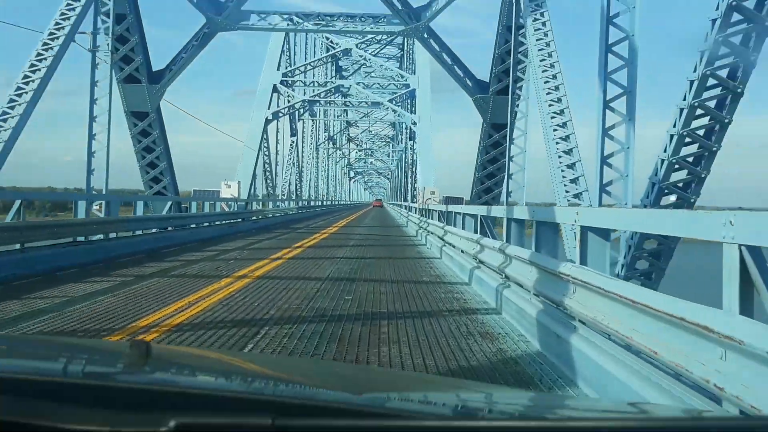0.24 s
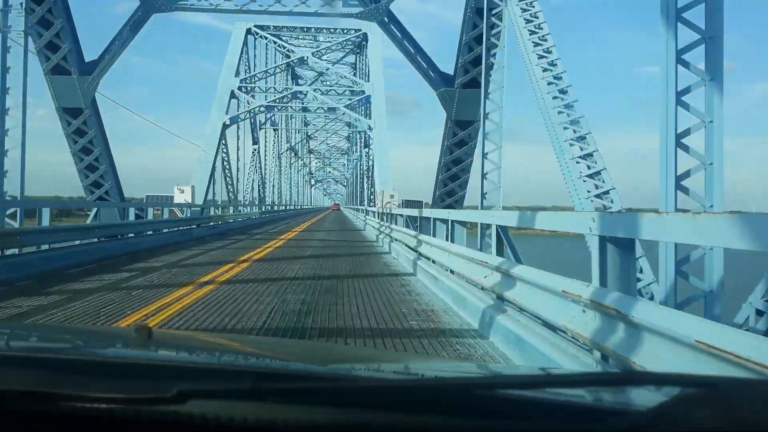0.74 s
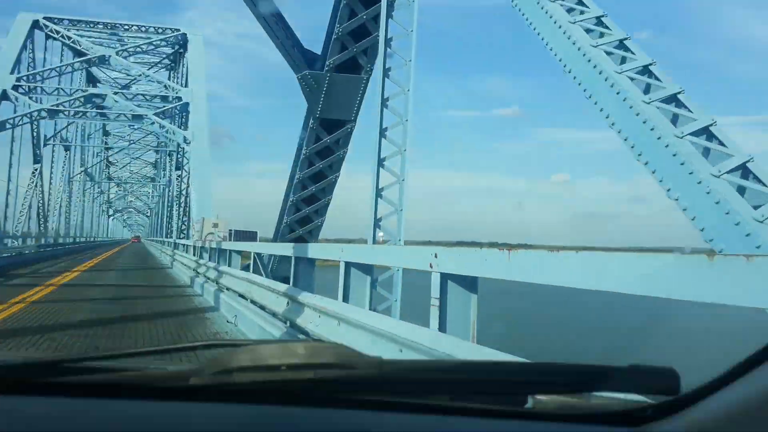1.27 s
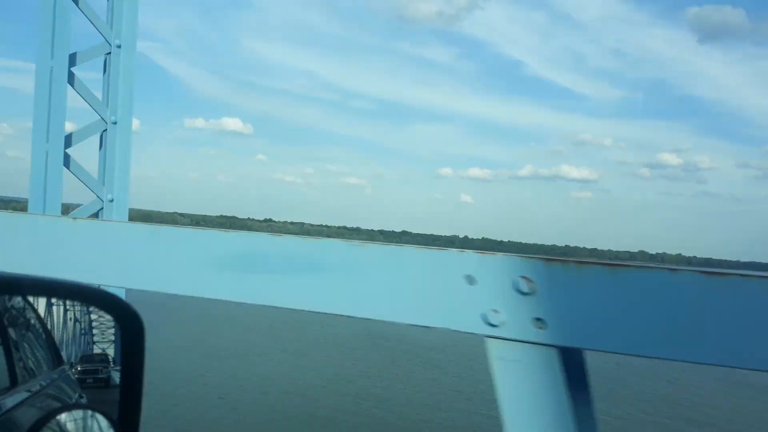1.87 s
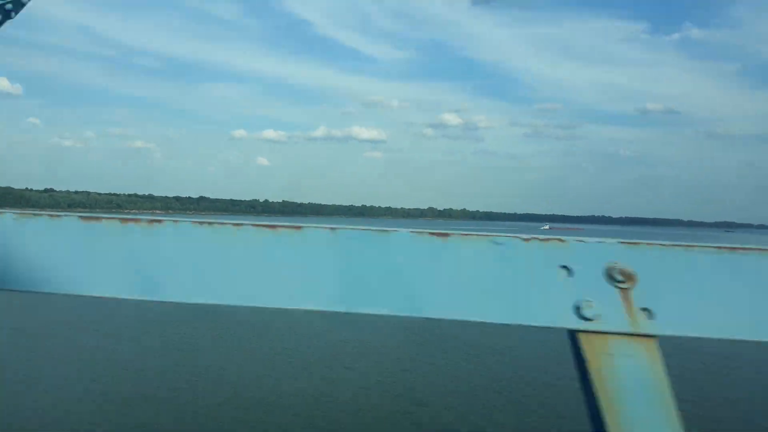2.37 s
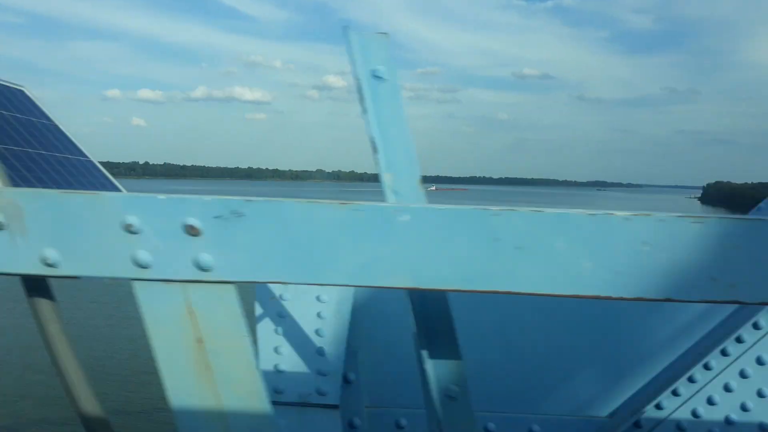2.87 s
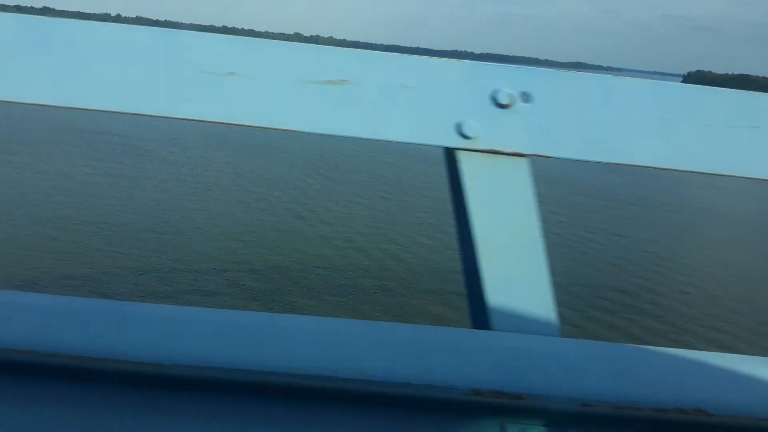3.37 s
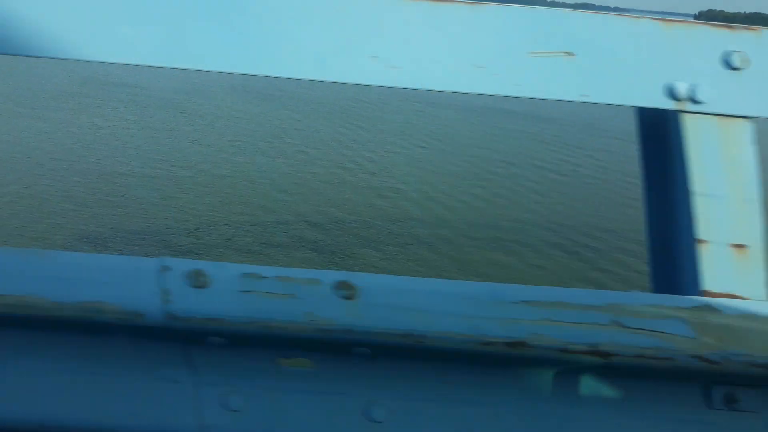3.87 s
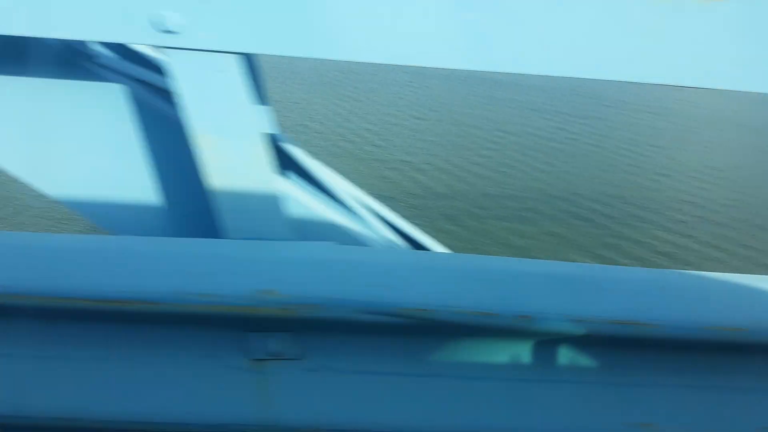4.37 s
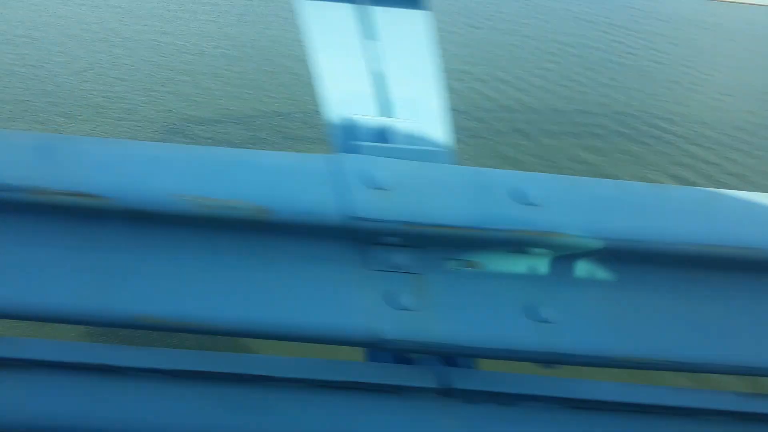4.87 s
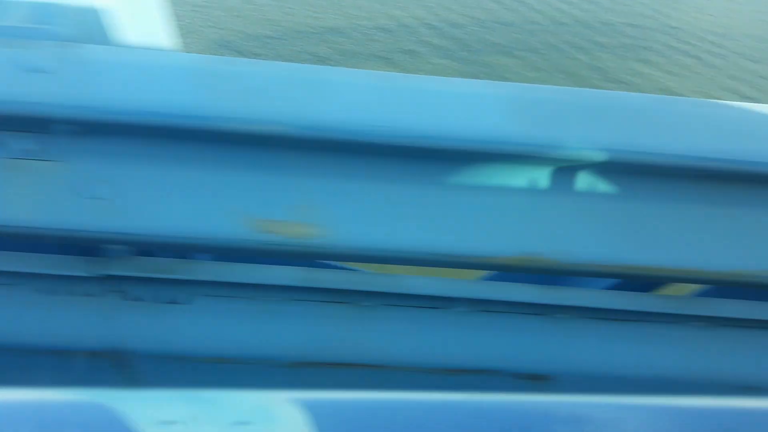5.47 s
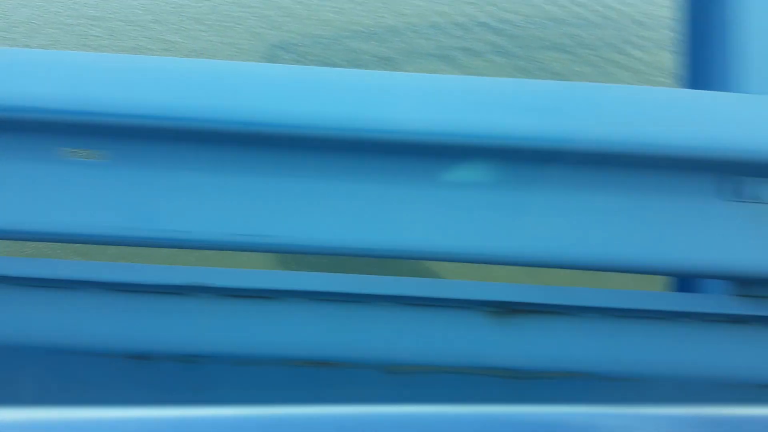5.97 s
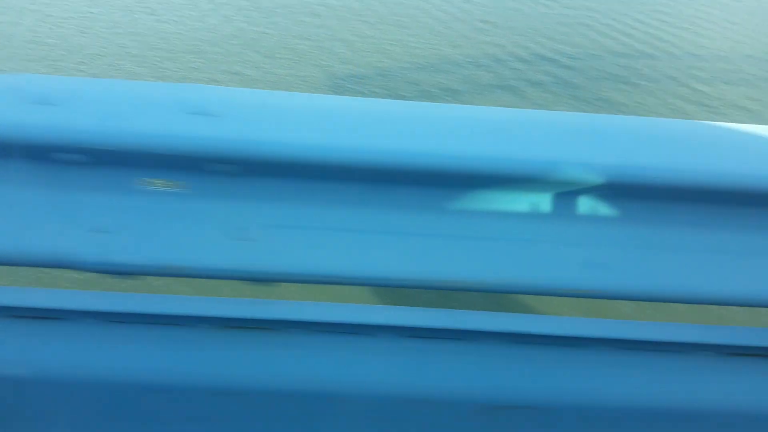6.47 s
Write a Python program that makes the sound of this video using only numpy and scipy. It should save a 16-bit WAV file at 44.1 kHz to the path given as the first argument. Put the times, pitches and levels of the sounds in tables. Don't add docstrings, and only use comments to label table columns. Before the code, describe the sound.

A steady low tyre drone dominates the car cabin, wavering and briefly dipping at deck seams, over deep body rumble and muffled road roar. First another car passes away on the other side, then a strong soft thump, handling ticks and cloth rubbing come close by. Thumps cluster around three seconds and another is strong just after four. Hand-held stereo microphones, enclosed and bass-heavy, with only faint hiss.

```python
import sys
import numpy as np
from scipy import signal
from scipy.fft import rfft, irfft, next_fast_len
from scipy.io import wavfile

SR = 44100
rng = np.random.default_rng(int(sys.argv[2]) if len(sys.argv) > 2 else 0)


def linear_from_db(decibels):
    return 10 ** (np.asarray(decibels, float) / 20)


def master(y):
    cut = np.clip(np.atleast_2d(y).T, -1, 1)
    pcm = np.round(cut * 32767)
    wavfile.write(sys.argv[1], SR, pcm.astype(np.int16))


N = 296793


def rms_one(x):
    return x / np.sqrt(np.mean(x ** 2) + 1e-20)


def in_time(rows):
    s, *columns = np.transpose(rows)
    return [np.interp(np.arange(N) / SR, s, column) for column in columns]


def at_hz(points, hz):
    table_hz, value = np.transpose(points)
    return np.interp(np.log(hz + 1), np.log(table_hz), value)


def drift(rate_hz):
    pole = np.exp(-80 * np.pi * rate_hz / SR)
    white = rng.standard_normal(N // 40 + 2002)
    slow = signal.lfilter([1], [1, -2 * pole, pole * pole], white)[2000:]
    return np.interp(np.arange(N) / 40, np.arange(len(slow)), rms_one(slow))


def sides(pan_db):
    return np.array([linear_from_db(pan_db / 2), linear_from_db(-pan_db / 2)])


# pitch_hz, likeness (-1 to 1)
LIKENESS = [(60, 1), (130, 0.97), (290, 0.84), (640, 0.28), (1410, -0.46), (3100, 0.042), (6820, -0.13),
            (15000, -0.031)]
# pitch_hz, left_minus_right_db
BALANCE = [(60, -1), (110, 1.5), (200, -0.5), (380, 0), (700, 0.5), (1290, 0.5), (2380, 1), (4400, -5),
           (8120, 4), (15000, -4)]


def coloured(spectrum, patchy_db, flicker_hz):
    size = next_fast_len(N)
    hz = np.arange(size // 2 + 1) * SR / size
    low, high = spectrum[0][0], spectrum[-1][0]
    alike = np.clip(at_hz(LIKENESS, hz), -0.99, 0.99)
    mid, side = rfft(rng.standard_normal((2, size)))
    both = np.sqrt(1 + alike) * mid + np.sqrt(1 - alike) * side * [[1], [-1]]
    both = both * linear_from_db(at_hz(spectrum, hz)) * (hz > low) * (hz < high)
    both = both * sides(at_hz(BALANCE, hz))
    half_octaves = 2 * np.log2(hz + 1)
    out = 0
    for k in range(int(2 * np.log2(low)), int(2 * np.log2(high)) + 2):
        band_gain = np.clip(1 - np.abs(half_octaves - k), 0, 1)
        band = irfft(both * band_gain, size)[:, :N]
        out = out + band * linear_from_db(patchy_db * drift(flicker_hz))
    return rms_one(out)


# pitch_hz, level_db (per Hz)
PREAMP = [(6000, -7), (8500, -5.5), (12000, 2.5), (15790, 2.5)]


def preamp_noise():
    return linear_from_db(-78) * coloured(PREAMP, patchy_db=2.0, flicker_hz=8.0)


# time_s, level_db
ONCOMING = [
    (0, -47.5),
    (.1, -37.5),
    (.35, -42.5),
    (.6, -55),
    (.9, -58),
    (1.2, -87),
]
# pitch_hz, level_db (per Hz)
ONCOMING_TONE = [(420, -20.5), (600, -5), (750, 2), (850, 2.5), (1000, -10), (1400, -11), (1800, -21),
                 (2400, -39)]


def oncoming_car():
    level_db, = in_time(ONCOMING)
    return linear_from_db(level_db) * coloured(ONCOMING_TONE, patchy_db=2.0, flicker_hz=3.8)


# time_s, level_db (about the mean)
SHAKE = [(0, 2), (.47, 2.5), (.9, 0), (1.25, -2), (1.5, -4), (1.9, 0.5), (2.4, 0), (2.6, 0), (2.9, 0),
         (3.05, -1.5), (3.4, 0), (3.75, -2), (3.95, 1.5), (4.28, 2), (4.7, 0), (5.2, -0.1), (5.7, -2),
         (6.73, -1)]


def shaken(mean_db, follows):
    shake_db, = in_time(SHAKE)
    return mean_db + follows * shake_db


def turned():
    start_s, length_s = 1.4, 0.31
    return np.clip((np.arange(N) / SR - start_s) / length_s, 0, 1)


# pitch_hz, level_db (per Hz)
HISS = [(1000, -25.5), (1400, 2.5), (2000, -0.5), (2700, -6), (3600, -6.5), (4300, -8), (5100, -18.5),
        (6500, -13.5), (6900, -18), (7100, -29.5), (8200, -39), (10000, -52.5)]


def hiss():
    level_db = shaken(-55, follows=0.54) + 1.5 * turned()
    return linear_from_db(level_db) * coloured(HISS, patchy_db=1.4, flicker_hz=4.5)


# pitch_hz, level_db (per Hz)
ROAR = [(250, -30.5), (350, -1), (440, -1), (520, -1.5), (635, 0.5), (710, -8.5), (870, -16.5), (1250, -18),
        (1450, -38.5), (2000, -44.5)]


def roar():
    level_db = shaken(-34.5, follows=0.96) + 1.5 * turned()
    return linear_from_db(level_db) * coloured(ROAR, patchy_db=1.0, flicker_hz=5.0)


# pitch_hz, level_db (per Hz)
BOOM = [(150, -29), (185, -17.5), (207, -13), (225, -0.5), (240, -6), (258, -12), (290, -4), (330, -8),
        (380, -23), (480, -33)]


def boom():
    level_db = shaken(-27, follows=1.98) - 1 * turned()
    return linear_from_db(level_db) * coloured(BOOM, patchy_db=0.1, flicker_hz=1.6)


# middle_s, half_length_s, first_multiple_loss_db,
# second_multiple_loss_db (negative: a swell)
SEAMS = [(0.104, .06, -3, 20), (0.173, 0.072, 10, 14), (0.286, 0.062, 3.5, 11), (0.373, 0.05, -5, 13),
         (0.71, 0.17, 17, 3.5), (1.17, 0.17, 13, 7.5), (1.541, 0.063, 11, 1.5), (2.222, 0.11, 1.5, 9),
         (2.489, 0.041, 6.5, 3), (2.569, 0.14, -3.5, 11), (2.893, 0.082, 2, 11), (3.093, 0.12, 3, 11),
         (3.165, 0.035, 1, 13), (3.35, 0.046, 12, 6), (3.53, 0.09, 3.5, 3.5), (3.687, 0.039, 7, 9.5),
         (4.007, 0.16, -2.5, 1.5), (4.99, .05, 1, 6), (5.22, 0.098, 11.5, 2.5), (5.518, 0.091, 2, 21.5),
         (5.95, 0.03, 12, -1), (6.075, 0.027, 10, -5), (6.618, 0.056, 7, 4.5), (0.847, 0.049, -2.5, -10.5),
         (1.94, 0.043, 6, -3.5), (3.272, 0.042, 5, 3), (4.29, 0.056, -2, -1.5), (5.08, 0.039, -7, -4.5),
         (6.212, 0.043, 2.5, 2), (6.387, 0.03, 10, 11)]


def seams_db():
    t = np.arange(N) / SR
    loss = np.zeros((2, N))
    for middle_s, length_s, *loss_db in SEAMS:
        crossing = np.clip(1 - np.abs(t - middle_s) / length_s, 0, 1)
        loss += np.outer(loss_db, crossing)
    return loss


# pitch_hz, level_db (per Hz)
RUMBLE = [(22, -37.5), (45, -14.5), (60, -17.5), (75, -11.5), (90, -1.5), (102, 0), (114, 0), (135, -4),
          (165, -0.5), (185, -4.5), (230, -25.5), (300, -53.5)]


def rumble():
    lull_db = 0.14 * seams_db().min(axis=0)
    level_db = shaken(-21.5, follows=0.96) - lull_db
    return linear_from_db(level_db) * coloured(RUMBLE, patchy_db=2.45, flicker_hz=1.1)


# start_s, peak_db, pitch_hz, t60_s
THUMPS = [(0.46, -5.5, 95.7, 0.22), (2.631, -12, 109.6, 0.35), (2.9, -18, 79.7, 0.2),
          (4.247, -5.5, 86.4, 0.25), (.42, -14, 225.4, 0.48), (2.858, -15.5, 222.3, .3),
          (3.1, -20, 230.4, 0.42), (3.269, -22.5, 227.5, 0.29), (3.849, -17.5, 233.6, 0.34),
          (4.201, -18.5, 218.5, .35), (4.718, -17.5, 236, .4), (3.129, -12.5, 70.6, .3)]


def thumps():
    out, t = np.zeros(N + SR), np.arange(SR) / SR
    for start_s, peak_db, pitch_hz, t60_s in THUMPS:
        i = round(start_s * SR)
        soft_start = 1 - np.exp(-t / 0.024)
        decay = linear_from_db(peak_db + 1.5 - 60 * t / t60_s)
        out[i:i + SR] += decay * soft_start * np.sin(2 * np.pi * pitch_hz * t)
    return out[:N]


# start_s, end_s, pitch_hz,
# width_hz, level_db
SINGING = [(0, 1.23, 6330, 330, -60.5), (.2, 0.88, 4300, 150, -62.5), (0.565, 0.74, 2880, 800, -48),
           (0.581, .74, 4000, 330, -52.5), (0.542, 0.76, 15000, 2200, -50),
           (0.634, 0.678, 11870, 900, -45.5), (1.2, 1.7, 930, 60, -54), (2.102, 2.648, 1884, 200, -59),
           (3.1, 3.695, 2560, 90, -64), (3.451, 3.509, 4200, 132, -49.5), (5.912, 5.938, 1500, 700, -50),
           (3.455, 3.5, 2100, 900, -54), (5.97, 6.12, 2700, 2000, -57), (5.948, 6.08, 15000, 1500, -78),
           (6.49, 6.52, 15000, 1470, -85.5)]


def singing():
    out = np.zeros((2, N))
    white = rng.standard_normal((2, SR * 2))
    for start_s, end_s, pitch_hz, width_hz, level_db in SINGING:
        i, size = round(start_s * SR), round((end_s - start_s) * SR)
        b, a = signal.iirpeak(pitch_hz, pitch_hz / width_hz, fs=SR)
        once = signal.lfilter(b, a, white[:, i // 8:i // 8 + size])
        tone = signal.lfilter(b, a, once)
        out[:, i:i + size] += linear_from_db(level_db) * rms_one(tone) * np.hanning(size) ** 0.34
    top = signal.ellip(10, 0.5, 60, 15760, fs=SR, output="sos")
    return signal.sosfilt(top, out + 1e-18)


# start_s, peak_db, pitch_hz, t60_s, left_minus_right_db
TICKS = [(.018, -35, 3600, 0.022, -4), (.042, -41, 4500, .015, 2), (.055, -36.5, 4000, .02, -13),
         (.094, -34, 4300, 0.015, -2), (0.565, -40.5, 3000, .05, -2), (.655, -28, 2010, 0.035, 11),
         (1.071, -50, 4230, 0.25, 1.5), (2.937, -39.5, 3640, 0.026, -6), (3.459, -42.5, 3100, 0.46, -5.5),
         (4.019, -50.5, 6830, 0.024, 1), (4.224, -42, 5500, 0.038, -4), (4.46, -45, 5000, 0.029, 1),
         (4.5, -48.5, 6900, 0.023, -4), (5.922, -35, 1500, 0.009, -3)]


def ticks():
    out, t = np.zeros((2, N + 8192)), np.arange(8192) / SR
    bursts = rng.standard_normal((len(TICKS), 3, len(t)))
    bursts = 0.7 * bursts[:, :1] + 0.84 * bursts[:, 1:]
    broad = signal.butter(2, 1100, "high", fs=SR, output="sos")
    edge = signal.cheby2(8, 45, 8000, fs=SR, output="sos")
    for (start_s, peak_db, pitch_hz, t60_s, pan_db), burst in zip(TICKS, bursts):
        b, a = signal.iirpeak(pitch_hz, 2.5, fs=SR)
        sound = signal.sosfilt(broad, burst) + 0.8 * signal.lfilter(b, a, burst)
        decay = linear_from_db(peak_db - 3.5 - 60 * t / t60_s)
        i = round(start_s * SR)
        out[:, i:i + len(t)] += sound * decay * sides(pan_db)[:, None]
    return signal.sosfilt(edge, out[:, :N] + 1e-18)


# middle_s, length_s, level_db, left_minus_right_db, fullness_db
STROKES = [(.06, 0.15, -78, 1.5, 14), (0.354, .12, -80, -5, 14), (0.598, .16, -66.5, 0, 1),
           (0.674, 0.13, -51.5, 3, 3), (0.77, .06, -64, -7.5, -0.5), (1.094, .1, -75, 1.5, 6.5),
           (1.31, 0.44, -71, 6, 0.5), (1.55, .2, -71.5, 5, 3), (1.614, .09, -58.5, -2, 1),
           (1.705, 0.067, -66, -3, 5), (1.83, 0.24, -72, 2, -2.5), (2.134, 0.17, -69, 0.5, -0.5),
           (2.4, 0.042, -69, -9, -3), (2.51, .07, -60.5, -8.5, -1.5), (2.62, 0.055, -64, -11, -2),
           (2.76, .09, -72, -8, 2.5), (2.847, 0.15, -67, -8, -3), (2.99, .06, -71, -8, -4),
           (3.135, 0.11, -69.5, -12, -1.5), (3.5, .25, -87, -9, -4)]
# pitch_hz, level_db (per Hz)
CLOTH_BRIGHT = [(5500, -34), (7000, 0.5), (8400, -13.5), (10000, -9.5), (11800, -7), (13000, -9.5),
                (14500, -5), (15790, -2.5)]
CLOTH_MIDDLE = [(1800, -29.5), (3000, -13), (4100, -2), (5000, -4), (6300, -1), (7000, -8), (7800, -19),
                (9500, -44.5)]


def sleeve():
    t = np.arange(N) / SR
    rub = linear_from_db(-72.5 - 5.5 * t)
    lean, full = 0, 0
    for middle_s, length_s, level_db, pan_db, full_db in STROKES:
        fall = np.minimum((2 * (t - middle_s) / length_s) ** 2, 10)
        stroke = linear_from_db(level_db - 21.5 * fall)
        rub = rub + stroke
        lean = lean + stroke * pan_db
        full = full + stroke * full_db
    bright_db = 20 * np.log10(rub)
    middle_db = -57.5 + 0.24 * (bright_db + 66.5) + full / rub
    moving = np.clip((3.9 - t) / 0.24, 0, 1)
    grain = linear_from_db(1.0 * drift(60.0))
    bright = linear_from_db(bright_db + 0.2) * coloured(CLOTH_BRIGHT, patchy_db=0.5, flicker_hz=12.0)
    middle = linear_from_db(middle_db) * coloured(CLOTH_MIDDLE, patchy_db=3.0, flicker_hz=6.0)
    return (bright + middle) * grain * moving * sides(lean / rub)


# time_s, grip_db, rear_behind_front (bar spacings, 0-0.5), edge_bite_db
AXLES = [(0, 0, .33, -3.5), (.37, 4.5, 0.31, -3), (.92, -3, 0.32, -9), (1.35, -1, 0.33, -7.5),
         (1.8, -2, 0.28, -6.5), (2.02, 6, 0.3, -3.5), (2.45, 2.5, 0.36, 4), (2.7, -0.6, 0.35, 1),
         (3.1, -1.5, 0.32, 0.5), (3.5, 5.5, 0.28, 0.5), (3.9, 0, 0.32, 2), (4.35, 3, 0.46, 1),
         (5.1, 3.5, 0.37, -4), (5.42, 3.5, .3, -3.5), (5.8, -5, 0.46, -11.5), (6.1, 1.5, 0.27, -2),
         (6.35, -0.4, 0.44, 0), (6.73, 3, 0.35, -4.5)]


def axles_db():
    grip_db, behind, bite_db = in_time(AXLES)
    seam_db = seams_db()
    levels_db = []
    for k, one_axle_db in enumerate([-19.5, -24.5]):
        rear = 0.76 * np.exp(2j * np.pi * (k + 1) * behind)
        pair_db = 20 * np.log10(np.abs(1 + rear))
        levels_db.append(one_axle_db + grip_db + pair_db - seam_db[k])
    return levels_db + [-39 + bite_db]


# time_s, rate_hz
BARS = [(0, 156), (1, 155.1), (2, 156.9), (3, 157.1), (3.7, 156.2), (4.5, 154.6), (5.4, 153.1), (6, 152.5),
        (6.73, 152.7)]
# multiple, level_db, blur_hz
UPPER_HUM = [(4, -45.5, 17.0), (5, -54, 14.0)]
HUM_PAN = [-0.8, -2, 0.5, 0.95, 0.85]
HUM_LAG = [.1, .2, .3, .4, .6]


def hum():
    rate_hz, = in_time(BARS)
    turns = 2 * np.pi * np.cumsum(rate_hz) / SR
    levels_db = axles_db()
    shakes = [(0.37, 9.0, 2.0), (0.2, 9.7, 1.3), (0.74, 10.0, 3.5)]
    for multiple, level_db, blur_hz in UPPER_HUM:
        levels_db.append(level_db)
        shakes.append((1.4, blur_hz, 3.0))
    out = 0
    for k, (phase_rad, shake_hz, flutter_db) in enumerate(shakes):
        phase = (k + 1) * turns + phase_rad * drift(shake_hz)
        height = np.sqrt(2) * linear_from_db(levels_db[k] + flutter_db * drift(shake_hz))
        apart = HUM_LAG[k] * (0.5 + drift(0.18)) * np.array([[0.5], [-0.5]])
        out = out + height * np.cos(phase + apart) * sides(HUM_PAN[k])[:, None]
    return out


def scene():
    road = oncoming_car() + hiss() + roar() + boom() + rumble()
    return road + thumps() + singing() + ticks() + sleeve() + linear_from_db(-0.73) * hum()


def roll_off(x):
    return signal.sosfilt(signal.butter(12, 16530, fs=SR, output="sos"), x)


def record(dry):
    limited = 1.577 * np.tanh(dry / 1.408)
    fade = np.clip((N - np.arange(N)) / (0.012 * SR), 0, 1)
    mix = (limited + preamp_noise()) * fade
    return roll_off(mix)


dry = scene()
out = record(dry)
master(out)
```